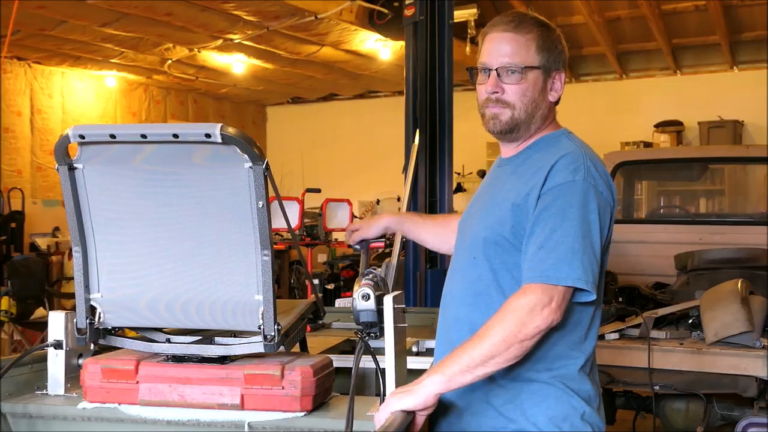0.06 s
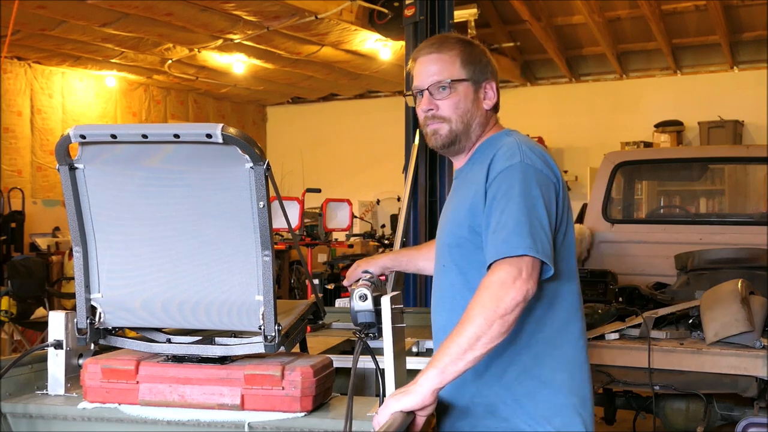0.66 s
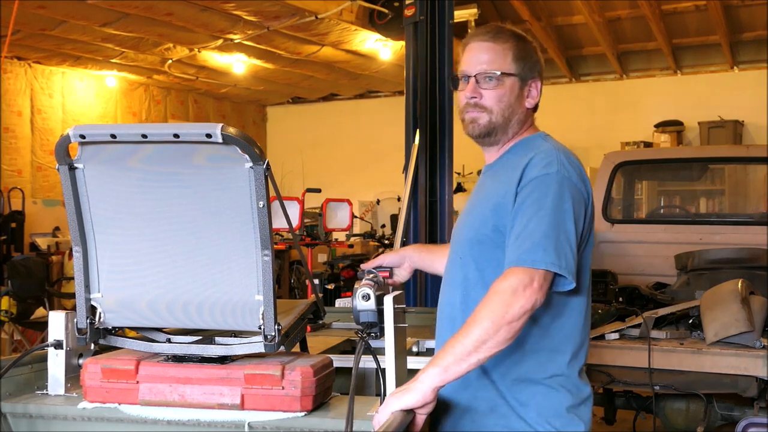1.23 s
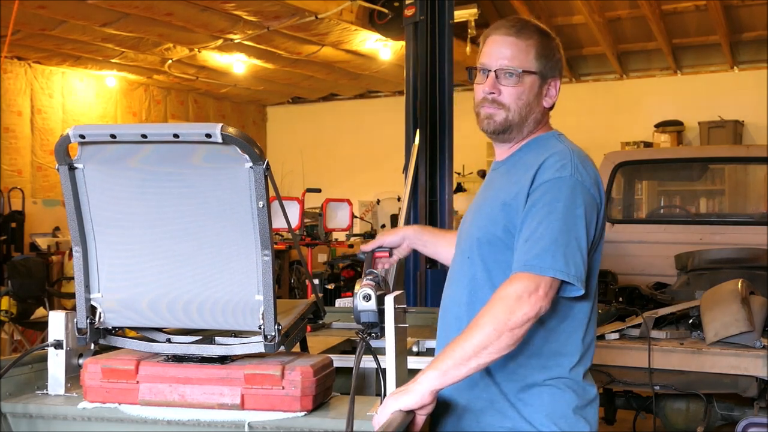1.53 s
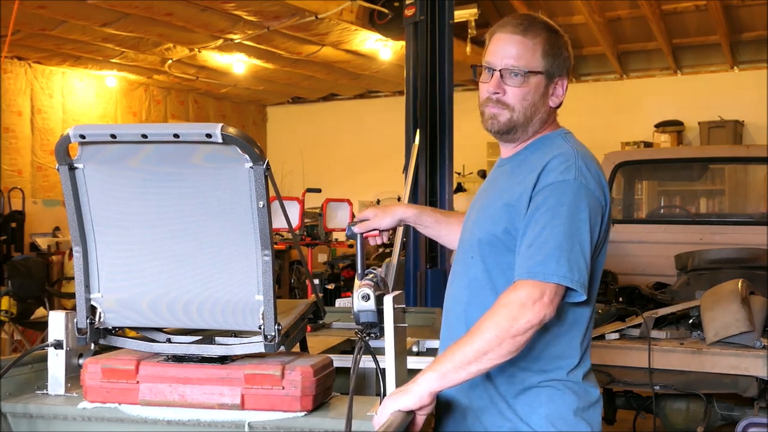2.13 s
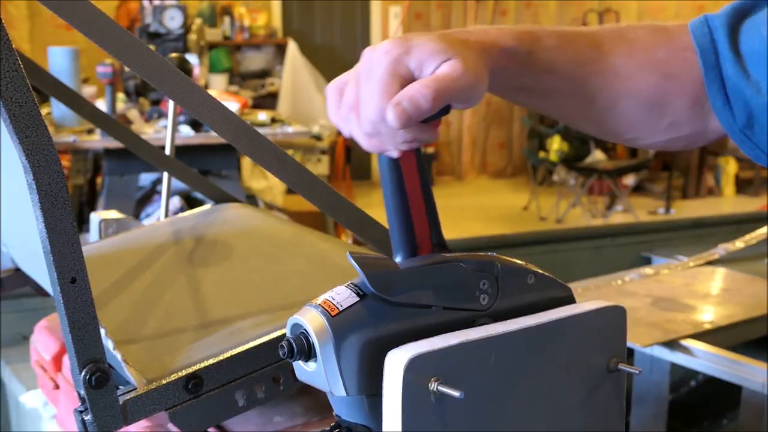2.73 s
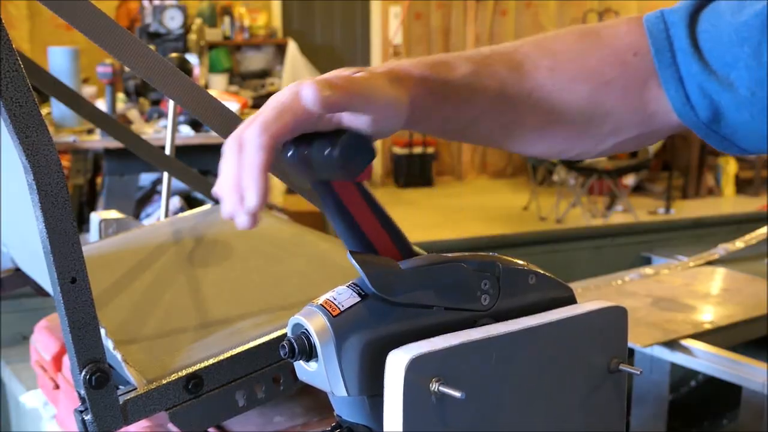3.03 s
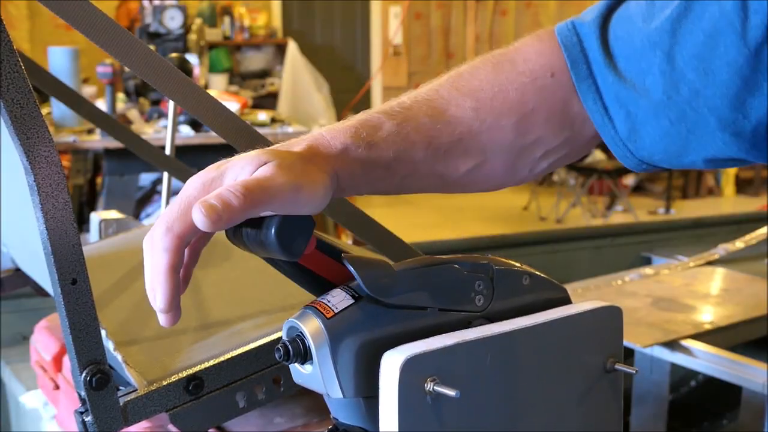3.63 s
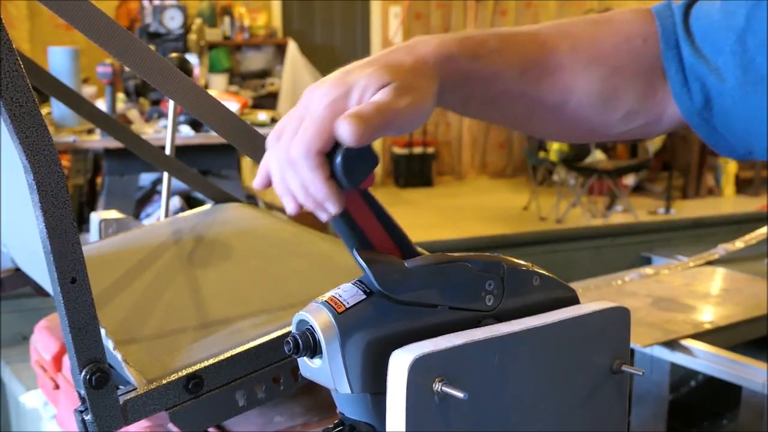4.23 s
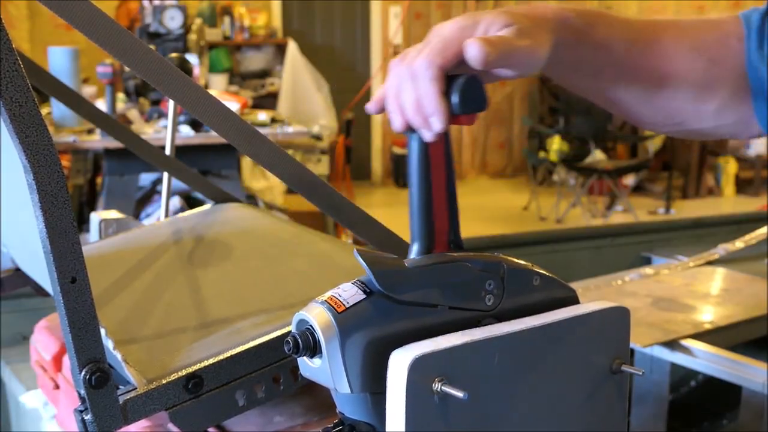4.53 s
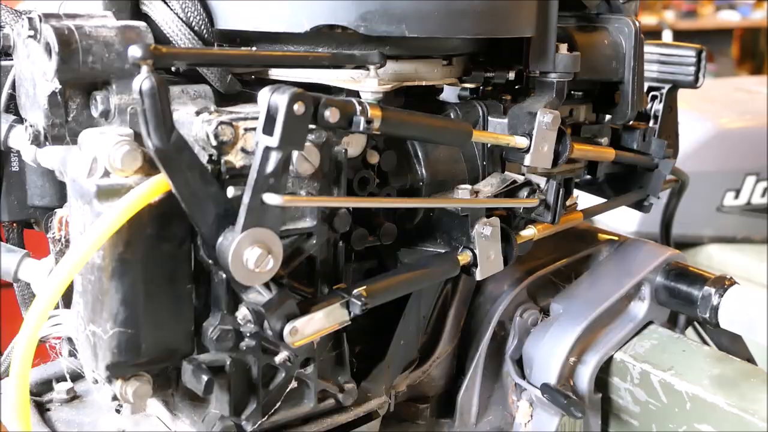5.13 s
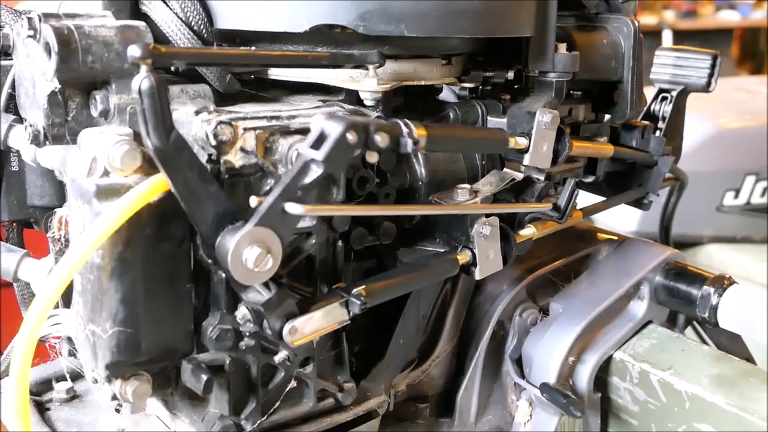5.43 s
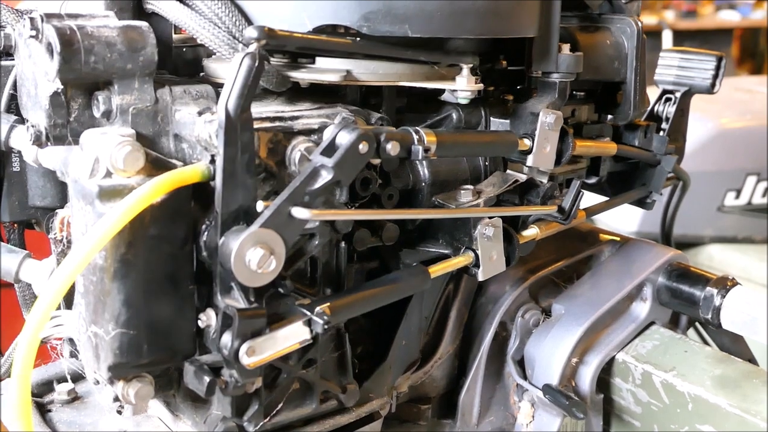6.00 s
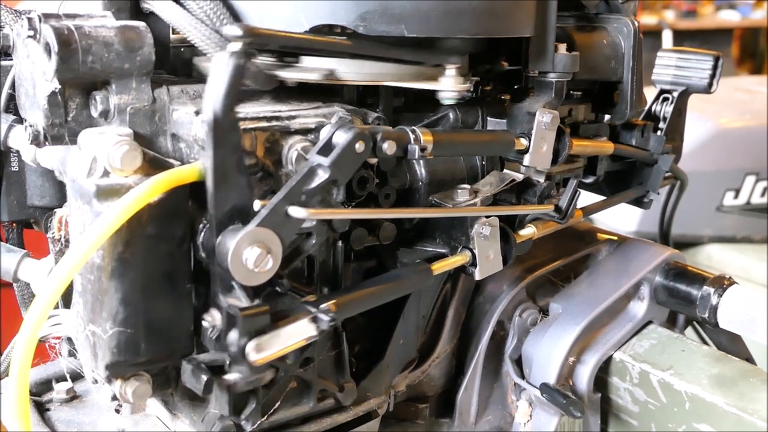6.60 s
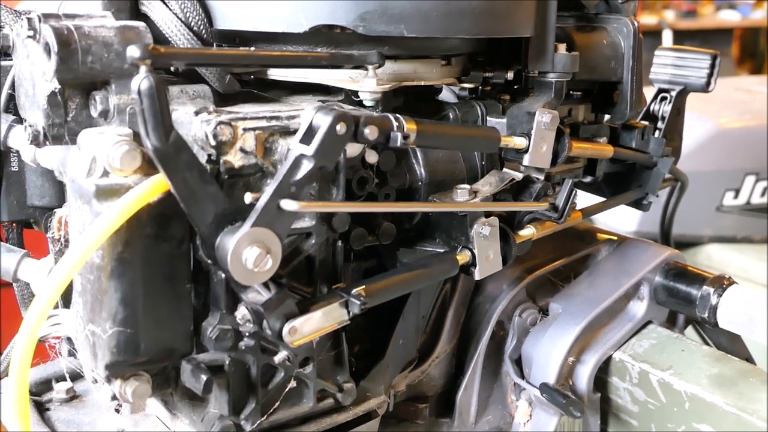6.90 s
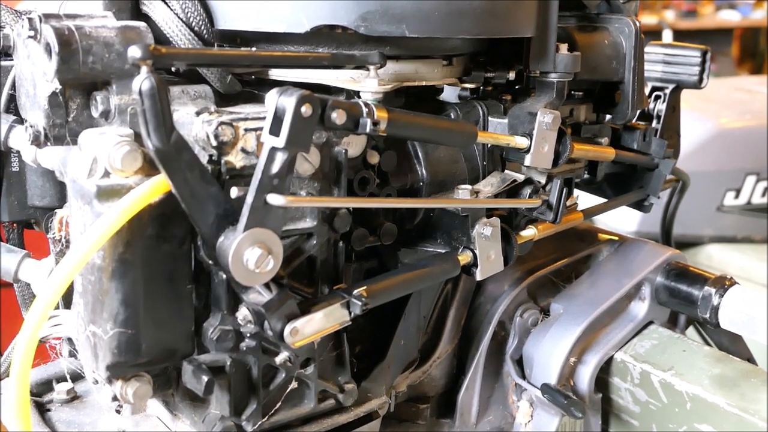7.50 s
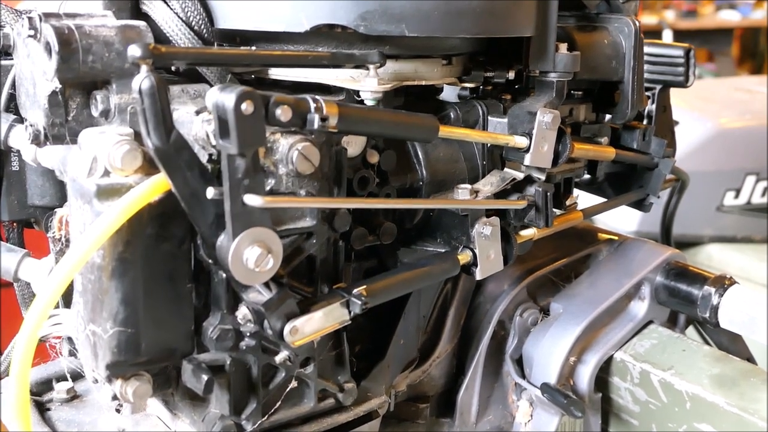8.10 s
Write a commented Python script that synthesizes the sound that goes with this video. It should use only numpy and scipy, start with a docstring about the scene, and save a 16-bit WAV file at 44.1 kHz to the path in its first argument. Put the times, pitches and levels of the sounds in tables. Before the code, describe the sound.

Sharp latch snaps, light clicks and metal clunks from a gear lever and cable linkage being worked, with hollow hull thuds.

```python
"""An outboard motor's remote control lever is worked in and out of gear in a workshop, engine off.
First, from a few steps back, cables drag and shove the linkage on the motor; at 1.9 s the neutral
latch snaps home. Then, close to the control box, detents click and the lever knocks in its play,
until the hardest snap at 4.6 s ducks the limiter. From 5.2 s, beside the motor, the linkage clunks
and squeaks, with a last snap at 7.1 s. All along, the hull booms and the shop rings on."""
import sys
import numpy as np
from scipy import signal
from scipy.fft import rfft, irfft
from scipy.io import wavfile
from scipy.ndimage import uniform_filter1d, minimum_filter1d

SR = 44100
rng = np.random.default_rng(int(sys.argv[2]) if len(sys.argv) > 2 else 0)


def unload_wav(signal):
    """Save mono or channel-first audio to the path in sys.argv[1] as 16-bit WAV at rate SR, clipped to [-1, 1]."""
    wavfile.write(
        sys.argv[1],
        SR,
        np.round(np.clip(np.atleast_2d(signal).T, -1, 1) * 32767).astype(np.int16),
    )


N = 368235
HIT_SAMPLES = 32768
HZ = np.fft.rfftfreq(HIT_SAMPLES, 1 / SR)


# Latch snaps and bounces: t/s, level/dB, tilt/(dB per octave)
SNAPS = [(1.9331, -21.5, -3), (1.9424, -5, 0.9), (4.6222, 5.5, 2.5), (4.632, 3.5, 1), (7.1193, -23.5, -5),
         (7.127, -29.5, -2), (7.1330, -13, 1.5)]
# Hard, bright latch tone: f/Hz, level/dB
LATCH_EQ = [(20, -57.5), (100, -20.5), (450, -16.5), (950, -1.5), (1500, -6.5), (2100, 1.5), (3200, -1),
            (4500, -6), (7000, -10.5), (10000, -9.5), (14000, -16.5), (16000, -48.5)]
# Its metallic ring: f/Hz, lift/dB, t60/s
LATCH_MODES = [(1030, 5.5, 0.057), (1134, 3.5, 0.12), (1547, -11, 0.09), (1790, 4.5, 0.07),
               (2155, -14, 0.53), (2140, 4, 0.083), (2380, -7.5, 0.017), (2900, 5, 0.026), (3647, 12, .05),
               (3933, 11, 0.068), (3680, 7, 0.6), (4940, 6.5, 0.08), (5460, 2.5, 0.026), (6030, -2.5, .03),
               (6230, 6, 0.01), (7020, 7.5, 0.014), (6600, -14, .035), (9170, -1, 0.017)]

def latch(chatter_s=0.014, thud_db=-25.5, jolt_db=-4, jolt_tilt=5.2, jolt_send_db=-24, jolt_thud_db=-42):
    """The latch snaps into neutral and jolts the lever, a dry knock that fades with distance."""
    snaps, jolts = [], []
    for s, db, tilt in SNAPS:
        send_db = shop_send(s, "box")
        snaps.append((s, db, tilt, chatter_s, send_db, db + thud_db))
        knock_db = db + jolt_db - 0.95 * send_db
        jolts.append((s, knock_db, jolt_tilt, chatter_s, jolt_send_db, db + jolt_thud_db))
    ring = strikes(snaps, LATCH_EQ, LATCH_MODES, crack=0.66, thud_t60=0.076)
    return ring + strikes(jolts, LEVER_EQ, LEVER_MODES, crack=0.95, thud_t60=0.074)


# Lever knocks and rattles: t/s, level/dB, tilt/(dB per octave), chatter t60/s, hull thud/dB
KNOCKS = [(2.3087, -38, -0.5, 0.015, -65), (2.392, -29, -2.5, 0.072, -35), (2.408, -37, 3, 0.049, -39),
          (2.5476, -33, 2, 0.15, -38.5), (2.556, -30.5, 0.5, 0.029, -34), (2.7862, -29, -6, 0.079, -31.5),
          (3.113, -35, 1, 0.076, -44), (3.1252, -24.5, 4, 0.032, -29.5), (3.135, -27, 0.5, 0.063, -35.5),
          (3.5899, -34, 3.5, 0.028, -42), (4.1516, -36, 1, 0.1, -40.5), (4.187, -35, 2.5, 0.014, -50),
          (4.3825, -38, -1, 0.047, -37), (4.396, -29.5, 6.5, .03, -38.5),
          (4.4738, -28.5, 1.5, 0.032, -40.5), (4.8704, -20, 3.5, 0.021, -25),
          (4.9134, -27.5, 1, 0.032, -44), (5.0474, -33.5, 2.5, 0.022, -52),
          (5.0561, -33.5, 2, 0.017, -63.5), (5.072, -36.5, 1, 0.016, -33), (5.0793, -24.5, 2, 0.039, -39.5),
          (5.105, -40.5, 4, 0.022, -55.5), (7.0390, -48, 11, 0.041, -45)]
# Dull, boxy lever tone: f/Hz, level/dB
LEVER_EQ = [(20, -45), (80, -27.5), (380, -12), (700, -3.5), (1150, 1), (2100, -2), (3400, -7),
            (5000, -20.5), (9000, -29.5), (16000, -55)]
# Its short ring: f/Hz, lift/dB, t60/s
LEVER_MODES = [(385, 13, 0.032), (1170, 0, 0.061), (1880, 3.5, 0.0076), (2440, -0.5, 0.026)]

def lever(send_trim_db=-2):
    """The lever knocks about in its play inside the control box."""
    hits = [(s, db, tilt, t60, shop_send(s, "box") + send_trim_db, thud_db)
            for s, db, tilt, t60, thud_db in KNOCKS]
    return strikes(hits, LEVER_EQ, LEVER_MODES, crack=0.53, thud_t60=0.061)


# Linkage clunks: t/s, level/dB, tilt/(dB per octave), chatter t60/s, hull thud/dB
CLUNKS = [(0.001, -34.5, -2, 0.49, -42), (0.262, -37.5, -4, 0.3, -50), (0.2894, -29.5, -3.5, 0.16, -28.5),
          (0.6480, -34, 4, 0.0059, -30.5), (0.659, -36.5, -5, 0.018, -31.5), (1.681, -34, 4, 0.035, -78),
          (1.7215, -32.5, -0.5, 0.14, -40), (1.7619, -31.5, -1.5, 0.12, -31),
          (2.8817, -31, 0.5, 0.073, -60), (5.2222, -41.5, -2, 0.03, -55), (5.254, -32.5, -9, 0.28, -34.5),
          (5.3120, -35.5, -11, 0.079, -56), (5.3772, -35, 5.5, 0.18, -64), (5.3989, -18.5, 2, 0.012, -40.5),
          (5.408, -26, -2, 0.048, -53), (5.4366, -32, -4, 0.017, -45), (5.4803, -28.5, -2.5, 0.23, -56),
          (5.553, -32.5, 2, 0.097, -33.5), (5.8202, -31.5, 4.5, 0.029, -33), (6.7535, -37, 7, .15, -54),
          (6.7801, -31, 3, 0.21, -31.5), (6.831, -30, -0.5, 0.18, -31), (7.0822, -35.5, 5.5, 0.24, -58),
          (7.7617, -31, 4, 0.23, -29), (7.8172, -25, 0, 0.078, -33.5), (7.8212, -20.5, 3.5, 0.024, -46),
          (7.86, -34.5, 0, 0.027, -54), (8.1963, -33.5, 1, 0.44, -41), (8.2425, -27.5, 1, 0.12, -27.5),
          (8.272, -30.5, -7.5, 0.16, -43)]
# Mid-heavy linkage tone: f/Hz, level/dB
LINKAGE_EQ = [(20, -43), (80, -26), (300, -5), (750, 6.5), (1500, 7), (2800, 4.5), (4000, -1), (6000, -3),
              (9500, -7), (13000, -15.5), (16000, -22)]
# Its faint ring: f/Hz, lift/dB, t60/s
LINKAGE_MODES = [(582, -5.5, 0.047), (810, -26, 0.2), (1370, -19, 0.046), (1747, -10, 0.09),
                 (2300, -5.5, 0.02), (3123, -5, 0.037), (5030, -5, 0.042), (6860, -4.5, 0.016)]

def linkage():
    """The shift and throttle arms on the motor hit their stops, cleanly or with a rattle."""
    hits = [(s, db, tilt, t60, shop_send(s, "motor"), thud_db) for s, db, tilt, t60, thud_db in CLUNKS]
    return strikes(hits, LINKAGE_EQ, LINKAGE_MODES, crack=0.54, thud_t60=0.14)


# Detent clicks: t/s, level/dB, tilt/(dB per octave)
CLICKS = [(1.9128, -34.5, -4), (2.7381, -25, -3), (2.7618, -33, -5), (2.9808, -20.5, -3), (3, -32.5, -4),
          (3.038, -33, -9), (4.3508, -25.5, 0), (4.5946, -24.5, -1), (4.6132, -22.5, -4), (6.5, -55.5, -3)]
# Thin, crisp detent tone: f/Hz, level/dB
DETENT_EQ = [(100, -28.5), (380, -32.5), (800, -39), (1400, -6.5), (2300, 1), (3600, 1), (6500, 0.5),
             (8200, -4.5), (12500, -1), (16000, -21)]
# Its high ping: f/Hz, lift/dB, t60/s
DETENT_MODES = [(2010, -2.5, 0.075), (2824, 0, .02), (4750, -2.5, .03), (6500, 5, 0.03), (7040, 8.5, .025),
                (10030, 3.5, 0.008), (12000, -5.5, 0.013)]

def detent(chatter_s=0.02, thud_db=-22.5):
    """The sprung detent in the box makes light clicks that barely stir the hull."""
    hits = [(s, db, tilt, chatter_s, shop_send(s, "box"), db + thud_db) for s, db, tilt in CLICKS]
    return strikes(hits, DETENT_EQ, DETENT_MODES, crack=1.0, thud_t60=0.04)


# Hollow hull boom: f/Hz, level/dB
HULL_EQ = [(20, -61), (45, -46), (70, -18.5), (110, -2.5), (170, -3), (300, 1), (520, -7), (720, -11),
           (1100, -16.5), (3000, -43.5), (16000, -91)]
# Its low ring: f/Hz, lift/dB, t60/s
HULL_MODES = [(124, -5.5, 0.21), (532.6, -0.5, 0.22)]

def hull():
    """Response of the hull, which booms under every hit and push."""
    return body(HULL_EQ, HULL_MODES)


# Pushes of the lever: t/s, length/s, rumble/dB, scrape/dB
PUSHES = [(0, 0.049, -49, -47), (0.174, 0.27, -40, -56.5), (0.553, 0.52, -50, -74),
          (1.35, 0.65, -44, -54.5), (2.202, .1, -46, -43.5), (2.532, 0.15, -38, -53),
          (2.857, 0.34, -44, -50), (3.464, .14, -49, -53), (3.605, 0.12, -41.5, -62),
          (3.927, 0.04, -46.5, -54.5), (4.095, 0.21, -43.5, -49.5), (4.405, 0.14, -40, -45),
          (4.88, 0.18, -55, -66.5), (5.214, 0.15, -42.5, -49.5), (5.503, 0.15, -37, -42),
          (5.853, 0.037, -40.5, -75.5), (6.514, 0.44, -44, -52), (7.436, 0.36, -48.5, -51.5),
          (8.056, 0.36, -44.5, -51.5)]
# Gritty sleeve tone: f/Hz, level/dB
SCRAPE_EQ = [(150, -15), (550, 1), (800, 6), (1150, 8), (1600, 1), (2300, 4), (3200, -0.5), (4300, -8),
             (9000, -11.5), (16000, -24.5)]

def cables(slips_per_s=800, spread_db=4.0, jerk_db=6.5):
    """Cables stick and give in uneven jerks; tiny slips scrape the sleeves and the hull rumbles."""
    wander = np.interp(np.arange(N), np.linspace(0, N, 240), rng.uniform(-1, 1, size=240))
    jerks = unit_rms(amp(jerk_db * wander))
    pushes = sum(np.outer(amp(levels), cable_speed(s, length)) for s, length, *levels in PUSHES)
    rumble_level, scrape_level = jerks * pushes
    slips = (rng.random(N) < slips_per_s / SR) * rng.choice([-1, 1], N)
    slip_sizes = amp(spread_db * np.minimum(rng.exponential(1, N), 4))
    scrape = scrape_level * equalised(slips * slip_sizes, SCRAPE_EQ)
    rumble = rumble_level * unit_rms(signal.oaconvolve(rng.standard_normal(N), irfft(hull()))[:N])
    direct = amp(-5) * scrape + amp(-6) * rumble
    send = amp(-2) * scrape + amp(-6) * rumble
    return np.array([direct, send])


def cable_speed(start, length, attack_s=0.012, release_s=0.057):
    """One push: the cable takes up its load, slides, then coasts to rest."""
    t = np.arange(N) / SR - start
    return np.clip(t / attack_s, 0, 1) * np.exp(-np.maximum(t - length, 0) / release_s)


# Brief squeaks: t/s, length/s, f/Hz, width/Hz, level/dB
SQUEAKS = [(0, 0.099, 947, 92, -48.5), (1.166, 0.36, 587, 108, -57), (2.995, 0.029, 2570, 500, -31),
           (3.015, 0.013, 2950, 500, -37), (4.147, 0.033, 1013, 40, -34), (6.445, 0.18, 1050, 200, -56),
           (6.815, 0.054, 1115, 220, -36.5), (7.499, 0.15, 1050, 260, -50), (7.712, .025, 1700, 150, -51),
           (7.76, 0.027, 500, 203, -35.5), (7.793, 0.056, 847, 160, -33)]

def squeaks(direct_db=-1, send_db=-7):
    """Dry pivots and cables sing as friction feeds one narrow resonance."""
    track = np.zeros(N)
    for s, length, hz, width, db in SQUEAKS:
        count = min(int(length * SR), HIT_SAMPLES)
        friction = rfft(rng.standard_normal(HIT_SAMPLES))
        tone = irfft(friction / (1 + 2j * (HZ - hz) / width) ** 2)[:count]
        add(track, s, amp(db) * unit_rms(tone * signal.windows.tukey(count, 0.4)))
    return np.array([amp(direct_db) * track, amp(send_db) * track])


def strikes(hits, eq, modes, crack, thud_t60, direct_thud_db=-3):
    """Each hit rings its part and thuds the hull; returns the direct sound and the reverb send."""
    part, boom = body(eq, modes), hull()
    unit_tilt = minimum_phase(np.log2(np.clip(HZ, 300, 12000) / 2000))  # 1 dB per octave
    direct, send = np.zeros((2, N))
    for s, db, tilt, chatter_t60, send_db, thud_db in hits:
        ring = part * np.exp(tilt * unit_tilt)
        thud = one_shot(contact(thud_t60, crack=0) * boom, thud_db)
        hit = one_shot(contact(chatter_t60, crack) * ring, db)
        add(direct, s, hit + amp(direct_thud_db) * thud)
        # the shop gathers sound from all directions, which evens out the chatter's ripple
        add(send, s, one_shot(ring, db + send_db) + thud)
    return np.array([direct, send])


def contact(t60, crack, spread_s=0.001968, rise_share=0.042):
    """Spectrum of one hard contact, smeared through the part, and the dying chatter of loose pieces."""
    age = np.arange(HIT_SAMPLES) / SR / max(t60, 0.002)
    envelope = np.exp(-np.log(1000) * age) * (1 - np.exp(-age / rise_share))
    chatter = rng.standard_normal(HIT_SAMPLES) * envelope
    # each band takes its own short path to the surface
    delay = spread_s * np.interp(HZ, np.linspace(0, SR / 2, 48), rng.random(size=48) ** 2)
    smear = np.exp(-2j * np.pi * np.cumsum(delay) * HZ[1])
    return rfft(chatter / np.linalg.norm(chatter)) + crack * smear


def body(eq, modes):
    """Response of a struck part: a broad tone with ringing modes on top."""
    rings = sum(amp(db) / (1 + 2j * np.pi * (HZ - hz) * t60 / np.log(1000)) for hz, db, t60 in modes)
    return np.exp(minimum_phase(curve(eq, HZ))) * (1 + rings)


def minimum_phase(db):
    """Complex log gain of the tightest-sounding filter with this shape."""
    cepstrum = irfft(db * np.log(10) / 20)
    cepstrum[1:HIT_SAMPLES // 2] *= 2
    cepstrum[HIT_SAMPLES // 2 + 1:] = 0
    return rfft(cepstrum)


def one_shot(spectrum, db):
    """Turns a hit's spectrum into a sound with the energy of 10 ms at this level."""
    fade = np.interp(np.arange(HIT_SAMPLES), [HIT_SAMPLES / 2, HIT_SAMPLES * 0.9], [1, 0])
    x = irfft(spectrum) * fade
    return amp(db) * x * np.sqrt(0.01 * SR / np.sum(x ** 2))


def equalised(x, eq):
    """Runs a whole track through an EQ curve, to rms 1."""
    gain = amp(curve(eq, np.fft.rfftfreq(N, 1 / SR)))
    return unit_rms(irfft(rfft(x) * gain, N))


def curve(points, hz):
    """Reads a table on a log-frequency axis."""
    f, value = np.transpose(points)
    return np.interp(np.log(hz + 1), np.log(f), value)


def amp(db):
    """Decibels to gain."""
    return 10 ** (np.asarray(db) / 20)


def unit_rms(x):
    """Scales to rms 1."""
    return x / np.sqrt(np.mean(x ** 2) + 1e-20)


def add(mix, s, sound):
    """Drops a sound into the mix at time s."""
    part = mix[max(round(s * SR), 0):][:len(sound)]
    part += sound[:len(part)]


# Perspectives (back from the boat, at the box, at the motor): from t/s, box send/dB, motor send/dB
PERSPECTIVES = [(0, -0.5, 0.5), (2.35, -8, 5.5), (5.2, 2.5, -5)]

def shop_send(s, source):
    """Reverb over direct sound in dB at time s: the farther the source, the wetter."""
    _, box_db, motor_db = [row for row in PERSPECTIVES if row[0] <= max(s, 0)][-1]
    return {"box": box_db, "motor": motor_db}[source]


# Workshop reverb time: f/Hz, t60/s
SHOP_DECAY = [(100, 0.85), (260, 0.64), (700, 0.64), (2000, 0.63), (5000, 0.67), (9000, 0.51),
              (14000, 0.49)]

def shop(send, bass_rise_s=0.0032, treble_rise_s=0.00069):
    """Dense reflections build up, the bass more slowly, and die band by band."""
    hz, t, noise = signal.stft(rng.standard_normal((2, SR)), SR, nperseg=256)
    rise_s = curve([(200, bass_rise_s), (2000, treble_rise_s)], hz)[:, None]
    decay = amp(-60 * t / curve(SHOP_DECAY, hz)[:, None])
    _, tail = signal.istft(noise * decay * (1 - np.exp(-t / rise_s)), SR, nperseg=256)
    response = diffuse(tail / np.linalg.norm(tail[0]))
    return signal.oaconvolve(send[None], response, axes=1)[:, :N]


# Soft, dark room tone: f/Hz, level/dB
AIR_EQ = [(20, -8), (50, -11.5), (78, -4.5), (120, -0.5), (200, 1), (320, -2.5), (600, -5), (1200, -12.5),
          (2200, -18), (4200, -24), (6500, -23), (10000, -23.5), (15000, -30.5)]

def room_tone(level_db=-54.5):
    """A steady bed of still shop air and microphone hiss."""
    pair = np.array([equalised(rng.standard_normal(N), AIR_EQ) for _ in range(2)])
    return amp(level_db) * diffuse(pair)


# Stereo width of the diffuse sound: f/Hz, left-right correlation
CORRELATION = [(25, -.2), (70, 0.04), (250, -0.22), (600, -0.24), (1400, 0.35), (3100, 0.64), (7000, 0.66),
               (15000, -0.14)]

def diffuse(pair):
    """Two unrelated sounds become one diffuse field at two close microphones."""
    hz = np.fft.rfftfreq(pair.shape[1], 1 / SR)
    left, other = rfft(pair)
    shared = np.clip(curve(CORRELATION, hz), -1, 1)
    right = shared * left + np.sqrt(1 - shared ** 2) * other
    return irfft(np.array([left, right]), pair.shape[1])


# Stereo lean: f/Hz, left minus right/dB
BALANCE = [(60, 1.5), (130, -0.5), (250, -1), (550, -2.5), (1100, -1.4), (2000, -0.7), (12000, 0)]
# Stereo phase: f/Hz, left lead/rad
PHASE_LEAD = [(2000, 0.021), (8000, 0.36), (13000, 0.23)]

def microphone_ports(pair):
    """The two ports differ a little in level and phase."""
    hz = np.fft.rfftfreq(N, 1 / SR)
    lean = amp(curve(BALANCE, hz) / 2) * np.exp(0.5j * curve(PHASE_LEAD, hz))
    return irfft(rfft(pair) * np.array([lean, 1 / lean]), N)


def scene():
    """All the moving parts, direct and through the shop, over room tone."""
    direct, send = latch() + detent() + lever() + linkage() + cables() + squeaks()
    air = room_tone()
    return microphone_ports(direct + shop(send) + air)


def record(dry, threshold_db=-10, recovery_db_per_s=64, ratio=7, low_cut_hz=42, high_cut_hz=15600):
    """A fast limiter ducks after the hardest snaps; then come clipping, a low cut and a high cut."""
    power = uniform_filter1d((dry ** 2).mean(0), size=66)
    power_db = 10 * np.log10(abs(power) + 1e-12)
    fall_db = np.arange(N) * recovery_db_per_s / SR
    held_db = np.maximum.accumulate(power_db + fall_db) - fall_db
    duck_db = -(1 - 1 / ratio) * np.maximum(held_db - threshold_db, 0)
    # a short look-ahead, so the gain has settled when a snap arrives
    gain_db = uniform_filter1d(minimum_filter1d(duck_db, size=70), size=60)
    clipped = np.clip(dry * amp(gain_db), -1, 1)
    low_cut = signal.butter(2, low_cut_hz, "high", fs=SR, output="sos")
    high_cut = signal.firwin(255, high_cut_hz, window=("kaiser", 9), fs=SR)
    return signal.oaconvolve(signal.sosfilt(low_cut, clipped), high_cut[None], "same")


dry = scene()
out = record(dry)
unload_wav(out)
```